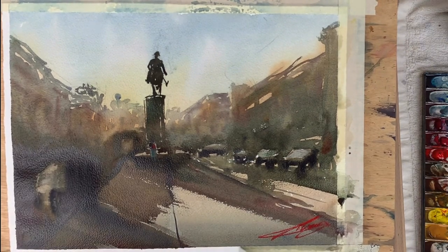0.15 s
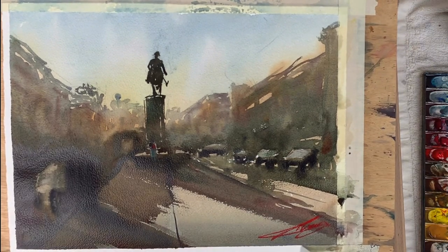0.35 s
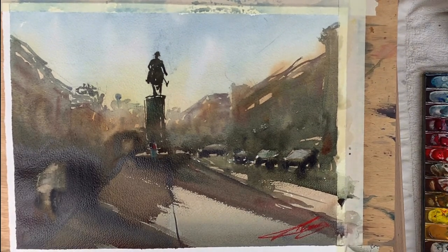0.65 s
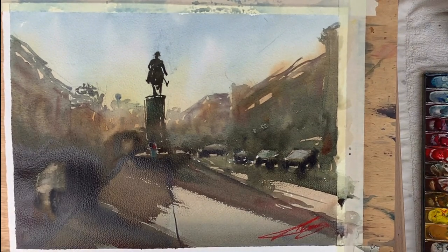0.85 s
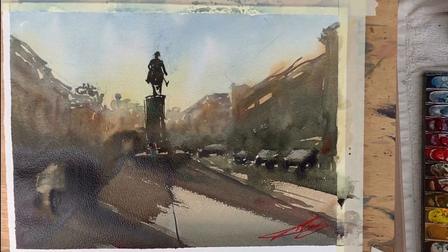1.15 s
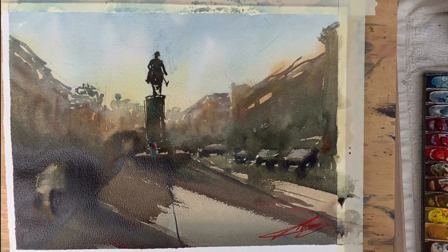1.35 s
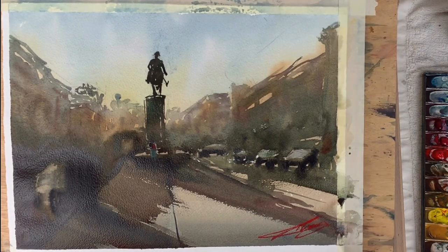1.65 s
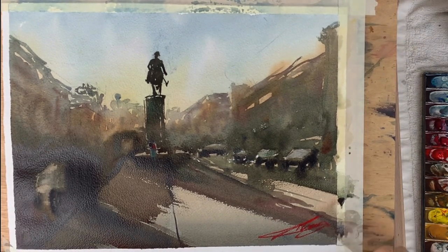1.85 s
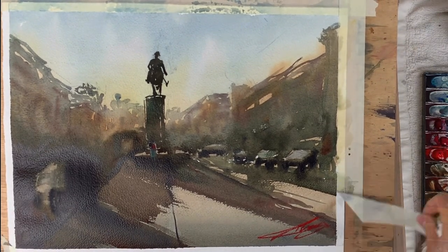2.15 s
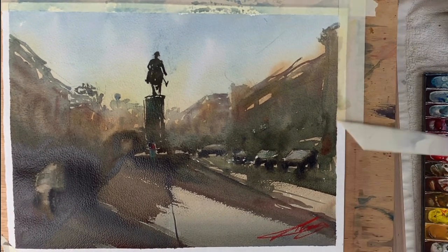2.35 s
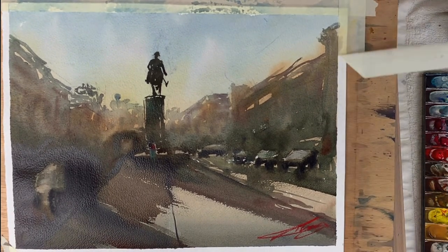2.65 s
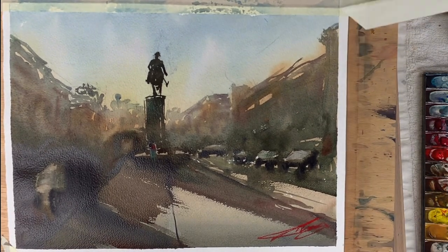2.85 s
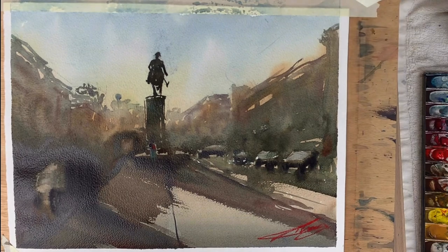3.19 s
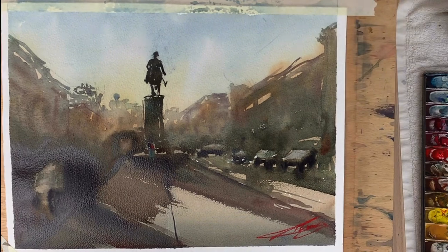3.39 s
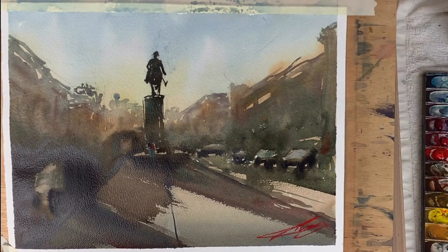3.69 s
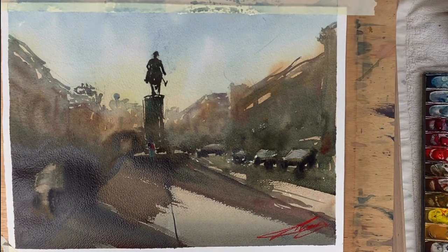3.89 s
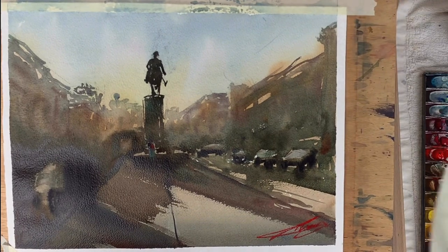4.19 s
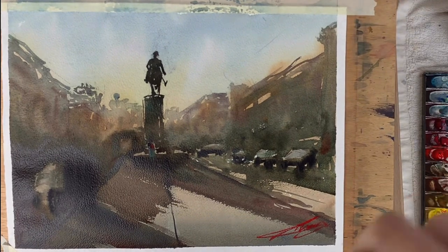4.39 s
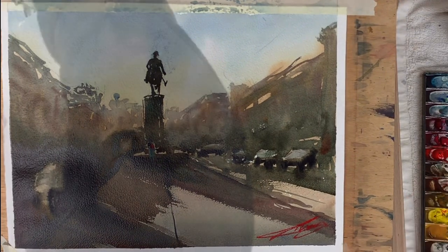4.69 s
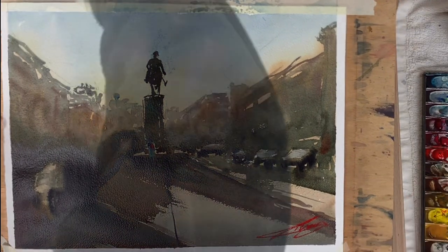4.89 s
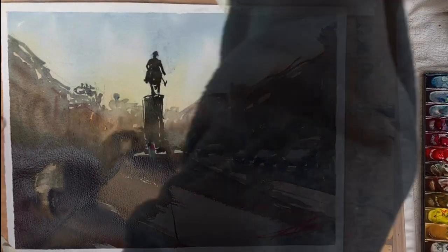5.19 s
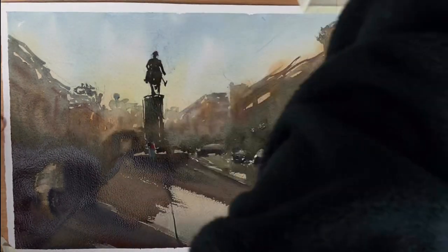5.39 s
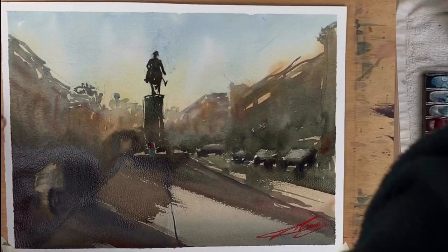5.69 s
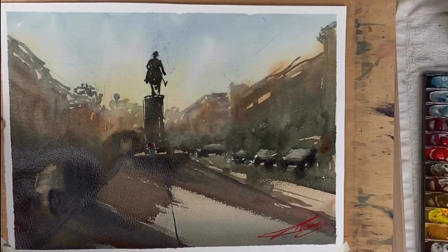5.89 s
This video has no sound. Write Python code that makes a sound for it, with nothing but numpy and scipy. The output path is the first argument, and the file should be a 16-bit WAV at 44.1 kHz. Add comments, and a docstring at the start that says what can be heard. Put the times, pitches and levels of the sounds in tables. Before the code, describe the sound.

Close stereo recording in a small quiet room. Masking tape peels off paper taped to a wooden board: a rasping pull with quick jerky rips in the first second, light crinkles, then a longer pull building to sharp snaps. Two more short rips follow, the loose strip ticks and rustles, and a final long peel crackles over low board thuds before quiet returns.

```python
"""Small room, wooden drawing board: masking tape is peeled off a sheet of paper.
Glue snaps are random impulse trains, filtered to crackle and rasp; sheet and board drum as tuned modes.
Some pulls end in dense rips with a thud. Hard snaps and ticks crack; the loose strip rustles and crinkles.
Hands bump the board and something light knocks the desk, over quiet room air.
Two close microphone ports hear it with reflections; the treble reaches the right port first."""
import sys
import numpy as np
from scipy import signal
from scipy.fft import rfft, irfft
from scipy.io import wavfile
from scipy.ndimage import uniform_filter1d

SR = 44100
rng = np.random.default_rng(int(sys.argv[2]) if len(sys.argv) > 2 else 0)


def file_out(sig):
    """Save sig as 16-bit WAV at sys.argv[1]."""
    # one column per channel
    cols = np.atleast_2d(sig).T
    # limit, then scale
    lim = np.clip(cols, -1, 1)
    pcm = np.round(lim * 32767).astype(np.int16)
    wavfile.write(sys.argv[1], SR, pcm)


N = 266364
TIME = np.arange(N) / SR

# Event and mode levels are relative; the sources and scene() set the final balance.
# pace of the hand in each long peel, as crackle level; one list a peel: start_s, level_db
HAND_PACE = [
    [(0.0, -42), (0.148, -44), (0.204, -43), (0.21, -44.5), (0.242, -43.5), (0.474, -47), (0.48, -58),
     (0.49, -37)],
    [(1.72, -100), (1.82, -68), (1.856, -63.5), (2.075, -43), (2.188, -41.5), (2.236, -44.5),
     (2.392, -46.5), (2.438, -52.5), (2.51, -55.5), (2.58, -47), (2.75, -47), (2.835, -43.5)],
    [(4.65, -59), (4.716, -47.5), (5.28, -43), (5.468, -46.5), (5.54, -53), (5.566, -42.5), (5.626, -79),
     (5.65, -62)],
]
# long peels: rasp_db, deep_modes_db, low_modes_db, middle_modes_db, high_modes_db, slack_s,
# boom_hz, boom_db, strip_first_hz, strip_last_hz, strip_db
PEELS = [(-6.5, -69, -57.5, -56.5, -49.5, 0.11, 230, -46, 370, 490, -16.5),
         (-3.5, -52.5, -57, -54, -55, 2.17, 610, -54.5, 2070, 1620, -17),
         (-2.5, -64, -50, -50, -47, 5.22, 264, -46, 1630, 1930, -11)]
# short tugs: start_s, length_s, pace_db, rasp_db, drum_db, strip_hz, strip_db
TUGS = [(0.463, 0.21, -46, -16, -53.5, 710, 6), (0.596, 0.1, -37.5, -6.5, -51.5, 746, -10),
        (0.831, 0.084, -46, -2, -47.5, 1270, -42), (1.031, 0.13, -43.5, -3.5, -44.5, 2240, -6.5),
        (3.065, 0.12, -44.5, -8, -52, 1240, -6.5), (3.183, 0.021, -44.5, -11, -74, 1180, -5),
        (3.212, 0.13, -38.5, -1.5, -45.5, 1030, -4), (4.511, 0.14, -52, -3.5, -46.5, 1630, -9)]
# fast rips: start_s, level_db, hold_s, thud_db
RIPS = [(0.465, -45, 0.0038, 9), (0.495, -35.5, 0.033, -32), (0.588, -37.5, 0.0047, -18),
        (0.596, -26, 0.006, -15), (0.6, -29, 0.0049, -14), (0.6077, -31.5, 0.0034, -5),
        (0.83, -35, 0.0071, -19), (0.844, -39, 0.0071, -0.5), (1.013, -47.5, 0.018, -23),
        (1.029, -32.5, 0.007, -12), (1.052, -29, 0.0022, -14), (1.059, -30, 0.003, 3),
        (2.763, -32, 0.004, -14.5), (2.8395, -26.5, 0.0092, -25), (2.848, -32, 0.026, -9),
        (3.057, -32.5, 0.01, -13), (3.071, -30.5, 0.007, -7), (3.21, -36.5, 0.009, 0.5),
        (3.248, -33.5, 0.019, -10)]
# single hard snaps of the glue and sharp ticks of the crinkling strip: start_s, peak_db
CRACKS = [(0.21, -17), (0.454, -31), (0.482, -19), (0.5168, -4.5), (0.5959, -2.5), (0.598, 1.5),
          (0.6068, -6), (0.612, -6), (0.624, -12), (0.8443, -17.5), (1.0336, -24), (1.0558, -14),
          (1.0625, -10), (1.279, -35.5), (1.499, -40.5), (1.664, -21.5), (2.019, -28), (2.069, -16),
          (2.076, -24), (2.0916, -24), (2.109, -24), (2.172, -18), (2.182, -19.5), (2.2288, -17),
          (2.331, -20), (2.376, -20), (2.57, -27), (2.59, -34), (2.613, -25), (2.684, -21), (2.692, -19),
          (2.735, -27), (2.768, -16.5), (2.81, -16), (2.826, -16), (2.8416, -4), (2.8575, -12), (2.866, -4),
          (3.0633, -10.5), (3.075, -9), (3.189, -26), (3.212, -7.5), (3.7905, -31), (3.8538, -22),
          (3.861, -25.5), (3.9014, -22.5), (4.0616, -36), (4.0828, -27), (4.193, -29.5), (4.222, -25),
          (4.2696, -25), (4.303, -20), (4.309, -31), (4.3175, -22.5), (4.5986, -20.5), (4.6282, -35),
          (5.269, -13), (5.359, -21)]
# rustles of the loose strip: top_s, level_db, rise_s, fall_s
RUSTLES = [(1.265, -56, 0.013, 0.027), (1.69, -54, 0.085, 0.13), (3.69, -60.5, 0.083, 0.19),
           (3.88, -67, 0.076, 0.056), (4.03, -57.5, 0.027, 0.052), (4.57, -52, 0.087, 0.037),
           (5.84, -59, 0.013, 0.12)]
# crinkles of the loose strip: start_s, level_db, hold_s, fold_hz, ring_db, edge_db
CRINKLES = [(1.33, -55, 0.011, 2260, 5, -32), (1.369, -59.5, 0.041, 1790, 7.5, -32.5),
            (1.53, -61.5, 0.0065, 4930, 5, 3), (1.603, -51, 0.011, 4500, -2, -6),
            (1.623, -48, 0.014, 3180, -1, 2), (1.652, -49, 0.017, 2950, 7, 10),
            (1.663, -40, 0.014, 2980, 8, -14), (3.432, -52.5, 0.009, 4100, 1, -23),
            (3.51, -51.5, 0.0048, 1340, 1, -21), (3.607, -52, 0.016, 1340, -1, -22),
            (3.67, -46, 0.012, 4200, -7, -3.5), (3.783, -40.5, 0.0093, 3200, -7, -2.5),
            (3.852, -48.5, 0.012, 3400, 14, 3), (3.882, -57.5, 0.0029, 3400, -1, 18),
            (3.901, -47.5, 0.0061, 3520, 14, 1), (4.016, -57.5, 0.013, 2300, 1, 8),
            (4.055, -40.5, 0.006, 3700, -2, -8), (4.082, -44, 0.0035, 2420, 12, -14),
            (4.159, -46, 0.002, 4000, 8, -19), (4.188, -51, 0.0017, 3020, 1.5, -1),
            (4.1931, -41.5, 0.0029, 3420, 6, -8), (4.1965, -42.5, 0.0017, 5000, 9, -15),
            (4.222, -43.5, 0.017, 3550, -8, 3), (4.244, -44, 0.022, 3230, 5, -9),
            (4.3035, -36.5, 0.0017, 3100, -1, -1), (4.309, -50.5, 0.0024, 1370, 16.5, 18),
            (4.3153, -41, 0.0018, 1700, 12.5, -13), (4.596, -38.5, 0.0014, 2780, 5, -6),
            (4.626, -33, 0.0027, 2780, 4, -2)]
# bumps on the sheet: start_s, swing_db, centre_hz, thud_db
BUMPS = [(.03, -49, 239, -72), (0.131, -43, 153, -75), (0.462, -48.5, 203, -42.5), (0.592, -34, 743, -68),
         (0.607, -46, 205, -62), (.648, -41, 198, -73), (0.843, -48.5, 197, -70), (.86, -45, 63, -71),
         (1.039, -40.5, 200, -64), (1.07, -42, 62, -65), (1.097, -37.5, 200, -56), (1.331, -56.5, 202, -56),
         (1.383, -58.5, 222, -56.5), (1.54, -55, 207, -59), (1.612, -52.5, 315, -63),
         (1.678, -59, 201, -58), (1.931, -47, 192, -49.5), (3.064, -42.5, 132, -62),
         (3.068, -41.5, 66, -63), (3.215, -50, 64.5, -50.5), (3.24, -34.5, 156, -59), (3.25, -48, 202, -67),
         (3.72, -62, 90, -54.5), (4.474, -53.5, 121, -69), (4.52, -52, 122, -50), (5.019, -38.5, 154, -70),
         (5.075, -41.5, 467, -66), (5.272, -32, 295, -61), (5.403, -38, 462, -50), (5.478, -37.5, 143, -45),
         (5.535, -38.5, 140, -49), (5.551, -40.5, 300, -54), (5.831, -73, 186, -65.5)]
# light knocks on the desk: start_s, level_db
KNOCKS = [(3.609, -58.5), (3.629, -61), (3.681, -49.5), (3.686, -58.5)]
# modes of the sheet on its board: mode_hz, level_db, t60_s
BOARD_MODES = [(63, -14, 0.2), (91, -2.5, 0.29), (124.2, -4, 0.33), (152.7, 1.5, 0.28), (203, -2, 0.34),
               (238.4, -11, 0.16), (300, -2.5, 0.21), (349, -17, 0.46), (401, 3.5, 0.3), (454.8, -1, 0.48),
               (474, 8, 0.21), (611.3, 1.5, 0.2), (658, -6, 0.11), (710, -9.5, 0.12), (780, -9.5, 0.17)]
# modes of the desk: mode_hz, level_db, t60_s
DESK_MODES = [(172.8, 0.5, 0.35), (208, -0.5, .2), (324, -3.5, 0.23), (497, 2, 0.095), (529, -1, 0.1),
              (630, -3, 0.089), (1295, -14, 0.12), (1441, -14, .14), (1830, 0, 0.082)]
# spectrum of breaking glue threads: freq_hz, density_db
CRACKLE = [(600, -42), (2000, -4.5), (4500, -2), (6500, 5), (8300, 4), (10500, 7.5), (13000, 2.5),
           (15600, 5), (17000, -77.5)]
# spectrum of the rasping paper backing: freq_hz, density_db
RASP = [(250, -1.5), (600, 0), (1150, -1.5), (1750, 0.5), (2400, -1), (3700, 3), (5000, 0.5), (8000, -22.5)]
# spectrum of a hard snap or sharp tick: freq_hz, density_db
SNAP = [(300, -15.5), (1200, -14.5), (2500, -11), (5000, -12), (8000, -3), (11000, 0), (15500, -3),
        (17000, -62.5)]
# spectrum of a dull thud: freq_hz, density_db
THUD = [(25, -25), (60, 5.5), (150, 7.5), (400, 2), (680, -5), (900, -13), (1300, -13.5), (2500, -40)]
# spectrum of the folding strip: freq_hz, density_db
FOLD = [(150, -22), (600, -8), (1500, -7), (4000, 5.5), (6000, -9.5), (9000, -4.5), (15000, -41),
        (17000, -3)]
# spectrum of the room air: freq_hz, density_db
AIR = [(20, 3), (50, 9.5), (120, -5.5), (300, -5.5), (800, -13.5), (3000, -14), (7000, -19.5), (15500, -17),
       (17000, -31)]
# decay of the room: freq_hz, t60_s
ROOM_DECAY = [(100, 0.47), (500, 0.42), (2000, 0.39), (6000, 0.37), (10000, 0.27), (16000, 0.15)]
# likeness of diffuse sound at the two ports: freq_hz, correlation
ALIKE = [(100, 0.88), (300, 0.62), (700, 0.05), (1500, 0.11), (4000, 0.012), (6500, 0.15), (8300, 1),
         (11000, 0.29), (15500, 1)]
# level, left minus right: freq_hz, difference_db
BALANCE = [(60, 2), (200, 2.5), (700, 3), (1700, 1.5), (2800, 0.5), (6000, -1.1), (9000, 0), (16000, 0)]
# phase lead of the left port; in the treble the right is about .2 ms earlier: freq_hz, lead_rad
LEAD = [(0, 0), (1100, .4), (3800, 3.0), (16500, -13.3)]

# glue starts to give; its uneven hold makes the peel surge (dB rms)
GRIP_S, SURGE_DB = .005, 1.4
# stick and slip: mean rate, spread of sizes, decay constant
JERKS_PER_S, JERK_SPREAD_DB, JERK_S = 105, 3.2, .0007
# pace at which rasp and modes have their listed levels
USUAL_PACE_DB = -44.5
# dB gained per dB of pace: rasp; deep, low, middle, high modes
RASP_LAW, MODES_LAW = 0.85, [0.29, 0.27, 0.26, 0.65]
# a tug slows from its first moment; mode offsets: deep, low, middle, high
TUG_SAG_DB_PER_S, TUG_MODES_DB = 120.5, [-4.5, -2, -8, -11]
# slack spot: time spread, Q of each boom resonator, swell of rasp and strip
SLACK_S, SLACK_Q, SLACK_RASP_DB, SLACK_STRIP_DB = 0.14, 2.57, 2, 6.5
# the sheet takes up the drive, and lets it go
DRUM_RISE_S, DRUM_FADE_S = 0.011, 0.041
# edges of the deep, low, middle and high mode families
FAMILY_EDGES_HZ = [52, 108, 175, 330, 830]
# the pull changes the sheet's tension: mode wander as a share of pitch, and its rate
WANDER, WANDER_HZ = .014, 2.3
# snap or tick: time to peak, pitch about which the strip rings
SNAP_S, FOLD_HZ = 0.00016, 2630
# fold: width of each of its two resonators, first tick above the run of clicks
FOLD_WIDTH_HZ, TICK_DB = 750, 20
# bump: build-up time constant, loss of a mode one octave away
SWING_RISE_S, SWING_LOSS_DB = 0.016, 53
# first reflections: extra gain as a ratio
NEAR_BOOST = 1.6
# upper band limit
EDGE_HZ = 16300


def pulling():
    """Long peels follow the hand's pace; short tugs start fast and slow down. Returns tape, sheet."""
    tape, sheet = np.zeros((2, N))
    t = TIME[:SR * 3 // 2]
    for curve, peel in zip(HAND_PACE, PEELS):
        rasp_db, *modes_db, slack_s, boom_hz, boom_db, first_hz, last_hz, strip_db = peel
        at_s, at_db = np.transpose(curve)
        s, length_s = at_s[0], at_s[-1] - at_s[0]
        pace_db = np.interp(s + t, at_s, at_db)
        slack = np.exp(-((s + t - slack_s) / SLACK_S) ** 2)
        strip_hz = np.interp(t, [0, length_s], [first_hz, last_hz])
        slack_rasp_db = rasp_db + SLACK_RASP_DB * slack
        slack_strip_db = strip_db + SLACK_STRIP_DB * slack
        add(tape, s, peeling(t, length_s, pace_db, slack_rasp_db, strip_hz, slack_strip_db))
        drum = drumming(t, length_s, pace_db, modes_db)
        boom = amp(boom_db) * slack * booming(boom_hz, size=len(t))
        add(sheet, s, drum + boom)
    t = TIME[:SR // 3]
    for s, length_s, start_db, rasp_db, drum_db, strip_hz, strip_db in TUGS:
        pace_db = start_db - TUG_SAG_DB_PER_S * t
        add(tape, s, peeling(t, length_s, pace_db, rasp_db, strip_hz, strip_db))
        add(sheet, s, drumming(t, length_s, pace_db, drum_db + np.array(TUG_MODES_DB)))
    return tape, sheet


def peeling(t, length_s, pace_db, rasp_db, strip_hz, strip_db):
    """Glue threads break in stick-slip clumps with sparse pops; backing rasps, taut strip resonates."""
    size = len(t)
    slips = decay(abs(grains(per_s=460, spread_db=1, size=size)), 0.00049)
    clumps = .55 + .55 * unit(slips) + jerking(size)
    threads = steady(grains(per_s=12000, spread_db=2.5, size=size) * clumps, 0.04)
    # the backing has a coarser grain
    fibres = steady(grains(per_s=3400, spread_db=2.5, size=size) * clumps, 0.051)
    surge = uniform_filter1d(rng.standard_normal(size), SR // 150)
    surge = unit(uniform_filter1d(surge, SR // 200))
    grip = gate(t, length_s, GRIP_S, GRIP_S) * amp(SURGE_DB * surge)
    level = amp(pace_db) * grip
    # slow peeling is duller
    papery = amp(USUAL_PACE_DB + RASP_LAW * (pace_db - USUAL_PACE_DB)) * grip
    crackle = amp(2.5) * colour(threads * level, CRACKLE)
    pops = amp(-5.0) * colour(grains(per_s=80, spread_db=4.5, size=size) * level, SNAP)
    rasp = amp(-0.38) * colour(fibres * papery * amp(rasp_db), RASP)
    taut = amp(13.0) * resonate(fibres * level * amp(strip_db), strip_hz, width_hz=150)
    return crackle + pops + rasp + taut


def jerking(size):
    """Stick and slip: decaying pulses at loosely regular gaps, each of its own size."""
    count = int(2 * JERKS_PER_S * size / SR)
    at = (np.cumsum(rng.gamma(2, .5, count)) * SR / JERKS_PER_S).astype(int)
    heights = amp(JERK_SPREAD_DB * rng.standard_normal(count))
    pulses = np.bincount(at, heights, size)[:size]
    return unit(decay(pulses, JERK_S))


def drumming(t, length_s, pace_db, modes_db):
    """Tugging tape drives four families of board modes, each growing with pace by its own law."""
    push = grains(per_s=900, spread_db=0.5, size=len(t))
    total = 0
    for k in range(4):
        family = steady(board(push, FAMILY_EDGES_HZ[k], FAMILY_EDGES_HZ[k + 1]), 0.046)
        total = total + family * amp(modes_db[k] + MODES_LAW[k] * (pace_db - USUAL_PACE_DB))
    return amp(-4.5) * total * gate(t, length_s, DRUM_RISE_S, DRUM_FADE_S)


def board(push, lo_hz, hi_hz):
    """Modes of sheet and board within one range ring, with wandering pitch, over a dull thud."""
    t = TIME[:SR // 2]
    ring = sum(amp(db - 60 * t / t60_s) * np.sin(2 * np.pi * hz * t)
               for hz, db, t60_s in BOARD_MODES if lo_hz < hz < hi_hz)
    band = signal.butter(3, [lo_hz, hi_hz], "band", fs=SR, output="sos")
    thud = signal.sosfilt(band, push)
    now = TIME[:len(push)]
    wander = np.sin(2 * np.pi * (WANDER_HZ * now + rng.random()))
    bent = now + WANDER * wander / (2 * np.pi * WANDER_HZ)
    ringing = signal.oaconvolve(push, ring)[:len(push)]
    return unit(np.interp(bent, now, ringing)) + amp(-6.5) * unit(thud)


def booming(boom_hz, size):
    """A slack patch of the sheet, pushed at random, resonates around a swaying pitch."""
    push = grains(per_s=160, spread_db=3.0, size=size)
    width_hz = boom_hz / SLACK_Q
    pitch_hz = boom_hz * (1 + .08 * np.sin(2 * np.pi * (5 * TIME[:size] + rng.random())))
    return steady(resonate(resonate(push, pitch_hz, width_hz), pitch_hz, width_hz), 0.047)


def ripping():
    """The tape lets go all at once: dense runs of snaps with a thud."""
    train = steady(grains(per_s=12000, spread_db=7.5), 0.025)
    out = np.zeros(N)
    for s, level_db, hold_s, thud_db in RIPS:
        run = amp(level_db) * burst(train, s, hold_s, rise_s=0.0032, release_s=0.0013)
        snaps = colour(run, CRACKLE)
        rasp = amp(-6.5) * colour(run, RASP)
        thud = amp(thud_db) * colour(run, THUD)
        add(out, s, snaps + rasp + thud)
    return out


def cracking():
    """Glue snaps and strip ticks: a tiny avalanche swells and dies in about 1 ms, ringing the strip."""
    t = TIME[:SR // 100]
    out = np.zeros(N)
    for s, peak_db in CRACKS:
        avalanche = t / SNAP_S * np.exp(1 - t / SNAP_S) + amp(-31) * np.exp(-t / 0.00093)
        splinters = rng.choice([-1, 1], len(t)) * avalanche
        # the strip rings a little differently each time
        ping_hz = FOLD_HZ * 2 ** rng.uniform(-0.67, 0.61)
        ping = resonate(splinters, ping_hz, width_hz=800)
        crack = colour(splinters, SNAP) + amp(-8) * ping
        add(out, s, amp(peak_db - 1.0) * crack / abs(crack).max())
    return out


def crinkling():
    """The strip rustles and buckles in short runs of clicks, each run ringing one fold."""
    train = steady(grains(per_s=800, spread_db=3.0), 0.0041)
    swells = 0
    for top_s, level_db, rise_s, fall_s in RUSTLES:
        spread_s = np.where(TIME < top_s, rise_s, fall_s)
        swells = swells + amp(level_db) * np.exp(-((TIME - top_s) / spread_s) ** 2)
    rustle = steady(grains(per_s=820, spread_db=1.5), 0.021) * swells
    out = amp(-14.5) * colour(rustle, FOLD) + amp(6.0) * resonate(rustle, 2900, width_hz=2060)
    for s, level_db, hold_s, fold_hz, ring_db, edge_db in CRINKLES:
        run = amp(level_db) * burst(train, s, hold_s, rise_s=0.00051, release_s=0.00027)
        run[0] += amp(level_db + TICK_DB)  # the fold gives way with a tick
        ring = resonate(resonate(run, fold_hz, FOLD_WIDTH_HZ), fold_hz, FOLD_WIDTH_HZ)
        body = amp(-0.5) * colour(run, FOLD)
        edge = amp(edge_db) * colour(run, SNAP)
        add(out, s, body + amp(ring_db + 5.0) * ring + edge)
    return out


def bumping():
    """A soft push gives a thud and sets the nearest modes of the sheet swinging."""
    train = grains(per_s=1500, spread_db=-1.0)
    out, t = np.zeros(N), TIME[:SR // 2]
    mode_hz, mode_db, t60_s = np.transpose(BOARD_MODES)[:, :, None]
    for s, swing_db, centre_hz, thud_db in BUMPS:
        shares = amp(mode_db - SWING_LOSS_DB * abs(np.log2(mode_hz / centre_hz)))
        shares = shares / np.linalg.norm(shares)
        modes = shares * amp(-60 * t / t60_s) * np.sin(2 * np.pi * mode_hz * (s + t))
        add(out, s, amp(swing_db + 5.0) * (1 - np.exp(-t / SWING_RISE_S)) * modes.sum(0))
        push = burst(train, s, 0.0023, rise_s=0.0014, release_s=0.049)
        add(out, s, amp(thud_db) * colour(push, THUD))
    return out


def knocking():
    """Something light is put down on the desk and rings its modes."""
    t, out = TIME[:SR // 3], np.zeros(N)
    for s, level_db in KNOCKS:
        ring = sum(amp(db - 60 * t / t60_s) * np.sin(2 * np.pi * (hz * t + rng.random()))
                   for hz, db, t60_s in DESK_MODES)
        add(out, s, amp(level_db) * (1 - np.exp(-t / 0.0016)) * ring)
    return out


def travelling(x, turn_s, count):
    """For a moving source, reflection patterns hand over in a cycle, one every turn_s."""
    away = (TIME / turn_s - np.arange(count)[:, None] + count / 2) % count - count / 2
    shares = np.cos(np.pi / 2 * np.clip(away, -1, 1))
    return diffuse(sum(room(x * share, rise_s=0.00031) for share in shares))


def room(x, rise_s):
    """Dense random reflections that die at their own speed in each band."""
    t = TIME[:SR * 3 // 4]
    taps = rng.standard_normal((2, len(t))) * (rng.random((2, len(t))) < 6000 / SR)
    taps *= np.clip(t / rise_s, 0, 1)
    taps *= 1 + NEAR_BOOST * np.exp(-t / 0.012)  # the desk and near wall answer first
    hz, at_s, bins = signal.stft(taps, SR, nperseg=256)
    fall = amp(-60 * at_s / read(ROOM_DECAY, hz)[:, None])
    tail = signal.istft(bins * fall, SR, nperseg=256)[1]
    tail = tail / np.linalg.norm(tail, axis=1, keepdims=True)
    return signal.fftconvolve(x[None], tail, axes=1)[:, :N]


def room_air():
    """Steady coloured noise, as alike at the ports as diffuse sound."""
    return diffuse(np.array([colour(noise, AIR) for noise in rng.standard_normal((2, N))]))


def diffuse(pair):
    """Makes two unrelated signals as alike as diffuse sound is at the two ports."""
    a, b = rfft(pair)
    alike = np.clip(read(ALIKE, np.fft.rfftfreq(pair.shape[1], 1 / SR)), -1, 1)
    return irfft([a, alike * a + np.sqrt(1 - alike ** 2) * b], pair.shape[1])


def grains(per_s, spread_db, size=N):
    """Random impulses of either sign, sizes exponentially spread in dB, scaled to rms 1."""
    height = amp(spread_db * np.minimum(rng.exponential(1, size), 4.5))
    return unit(height * rng.choice([-1, 1], size) * (rng.random(size) < per_s / SR))


def burst(train, s, hold_s, rise_s, release_s):
    """A short run of grains from time s that swells, holds, then dies away."""
    part = train[round(s * SR):][:SR // 5]
    t = TIME[:len(part)]
    return part * (1 - np.exp(-t / rise_s)) * np.exp(-np.maximum(t - hold_s, 0) / release_s)


def gate(t, length_s, rise_s, fade_s):
    """Rises, holds for the length, then fades to nothing."""
    return np.clip(t / rise_s, 0, 1) * np.clip(1 + (length_s - t) / fade_s, 0, 1)


def decay(x, time_s):
    """Lets every impulse die away exponentially."""
    return signal.lfilter([1], [1, -np.exp(-1 / (time_s * SR))], x)


def resonate(x, hz, width_hz):
    """A resonance of peak gain about 1 whose pitch can follow a curve."""
    turn = np.exp(2j * np.pi * np.cumsum(hz * np.ones(len(x))) / SR)
    r = np.exp(-np.pi * width_hz / SR)
    return 2 * (turn * signal.lfilter([1 - r], [1, -r], x / turn + 1e-18)).real


def click(spectrum, size=2048):
    """Causal minimum-phase impulse of energy 1 with the given spectrum."""
    log_gain = np.log(amp(read(spectrum, abs(np.fft.fftfreq(size, 1 / SR)))))
    h = np.fft.ifft(np.exp(np.conj(signal.hilbert(log_gain)))).real[:size // 2]
    return h / np.linalg.norm(h)


def colour(x, spectrum):
    """Gives every impulse in x the spectrum."""
    return signal.oaconvolve(x, click(spectrum))[:len(x)]


def read(points, hz):
    """Reads a table on a log-frequency axis."""
    f, value = np.transpose(points)
    return np.interp(np.log(hz + 1), np.log(f + 1), value)


def amp(db):
    """Decibels to gain."""
    return 10 ** (np.asarray(db) / 20)


def unit(x):
    """Scales to rms 1."""
    return x / np.sqrt(np.mean(x ** 2) + 1e-20)


def steady(x, seconds):
    """Scales to a running rms of 1."""
    return x / np.sqrt(abs(uniform_filter1d(x ** 2, max(int(seconds * SR), 2))) + 1e-12)


def add(mix, s, sound):
    """Adds a sound into the mix at time s."""
    part = mix[max(round(s * SR), 0):][:len(sound)]
    part += sound[:len(part)]


def scene():
    """Mixes tape, board, their reflections and quiet room air."""
    peel, drum = pulling()
    rips = ripping()
    cracks = cracking()
    strip = crinkling()
    bumps = bumping() + knocking()
    direct = amp(-7.0) * peel + amp(-7.0) * rips + amp(-4.0) * cracks
    direct = direct + amp(-8.5) * strip + drum + bumps
    sent = amp(-1.5) * peel + amp(-2.0) * rips + amp(-7.0) * cracks
    sent = sent + amp(-2.5) * drum + amp(-6.5) * strip + amp(-13) * bumps
    air = room_air()
    return direct + travelling(sent, turn_s=.09, count=5) + amp(-71.5) * air


def record(dry):
    """The two ports differ in phase and level; then the band limits."""
    hz = np.fft.rfftfreq(N, 1 / SR)
    phase = np.interp(hz, *np.transpose(LEAD))
    lean = amp(read(BALANCE, hz) / 2)
    ports = irfft(rfft(dry) * np.array([lean * np.exp(1j * phase), 1 / lean]), N)
    ports = signal.sosfilt(signal.butter(7, 44, "high", fs=SR, output="sos"), ports)
    low_pass = signal.firwin(255, EDGE_HZ, window=("kaiser", 8), fs=SR)
    return signal.oaconvolve(ports, low_pass[None], "same")


dry = scene()
out = record(dry)
file_out(out)
```